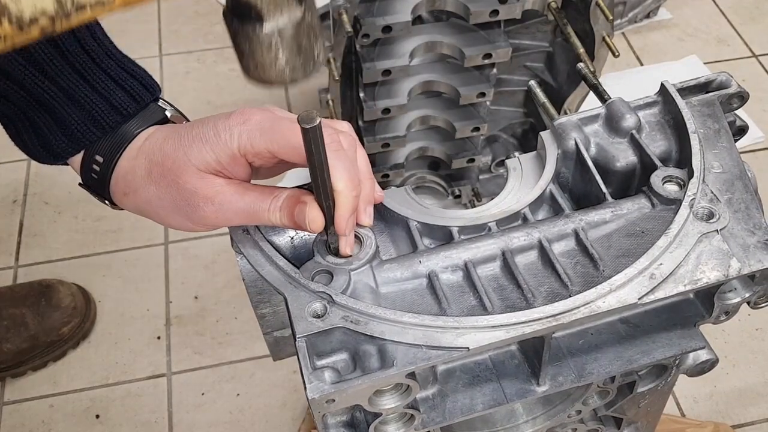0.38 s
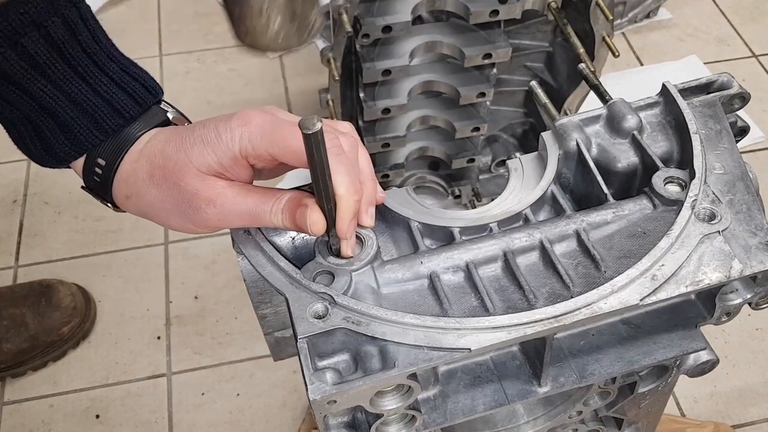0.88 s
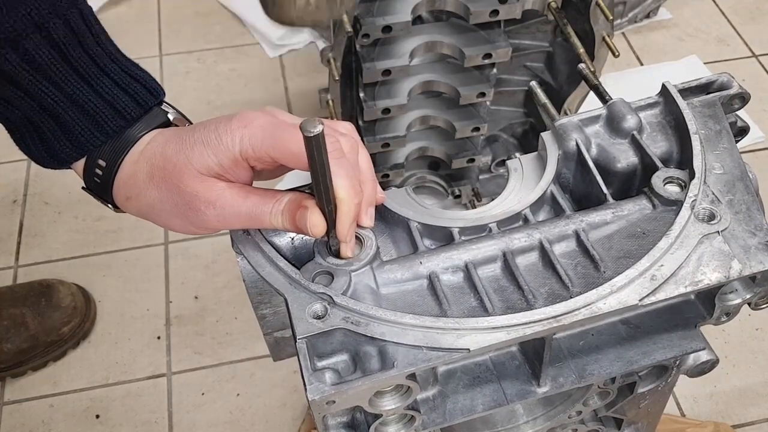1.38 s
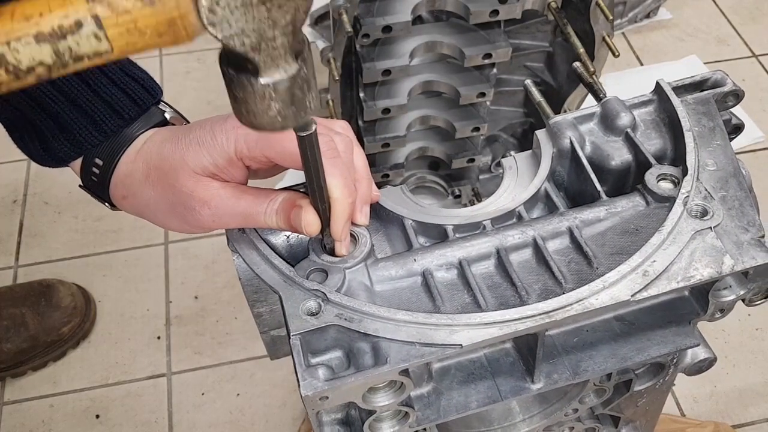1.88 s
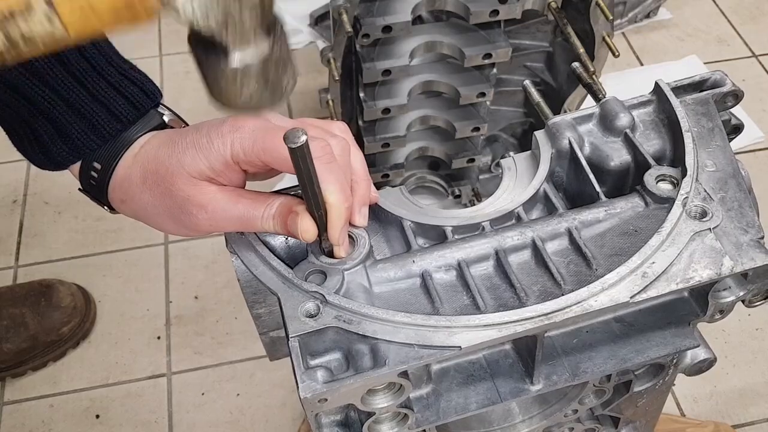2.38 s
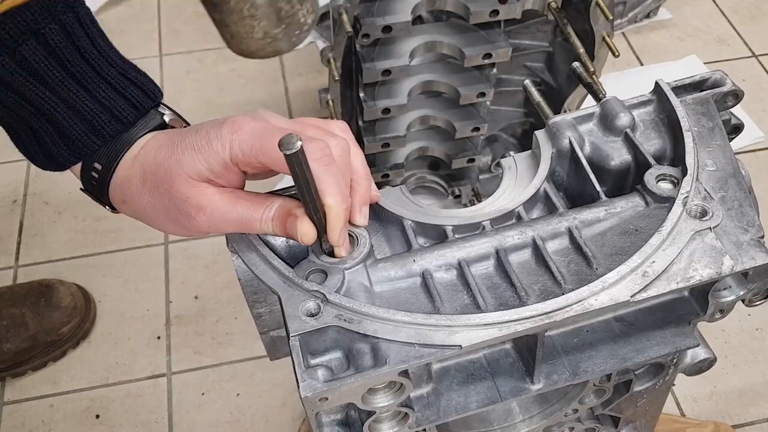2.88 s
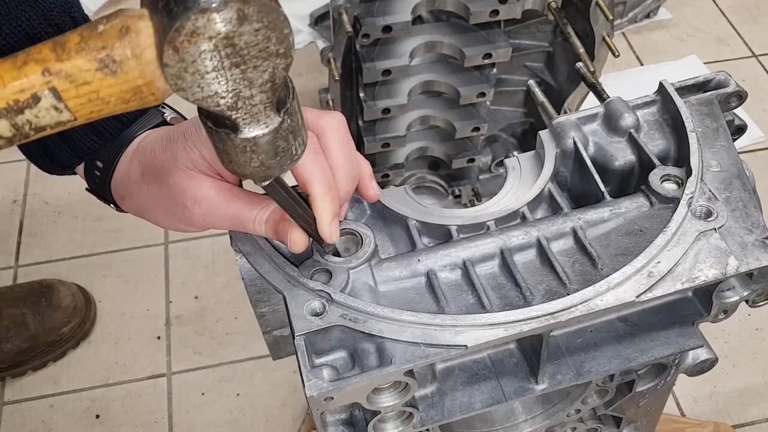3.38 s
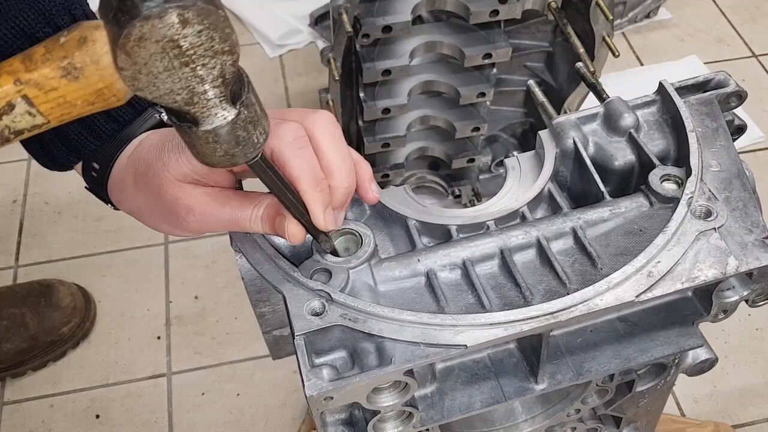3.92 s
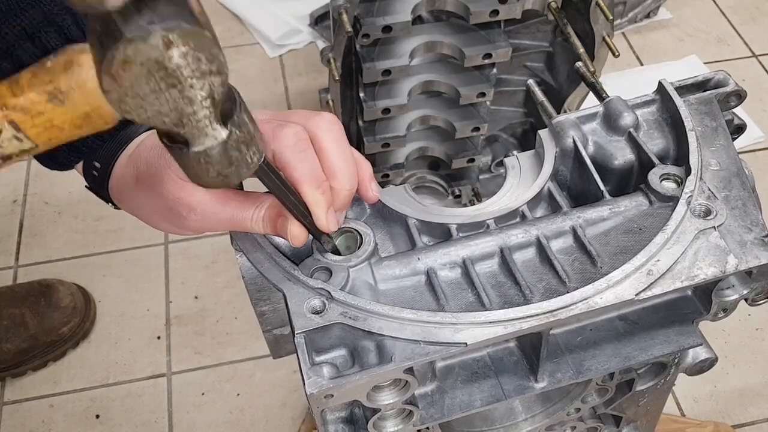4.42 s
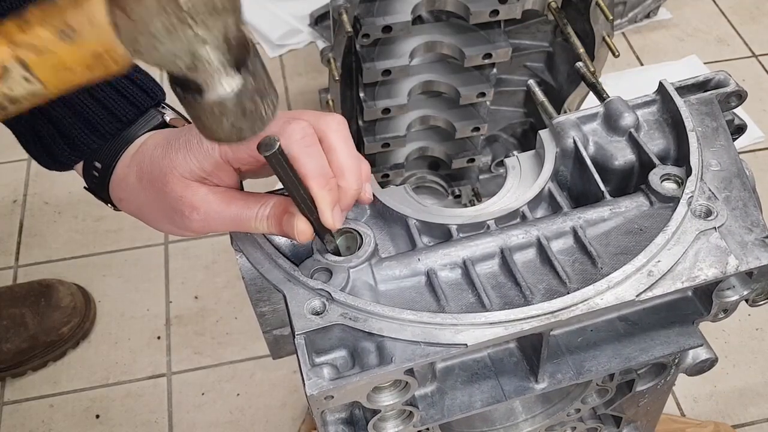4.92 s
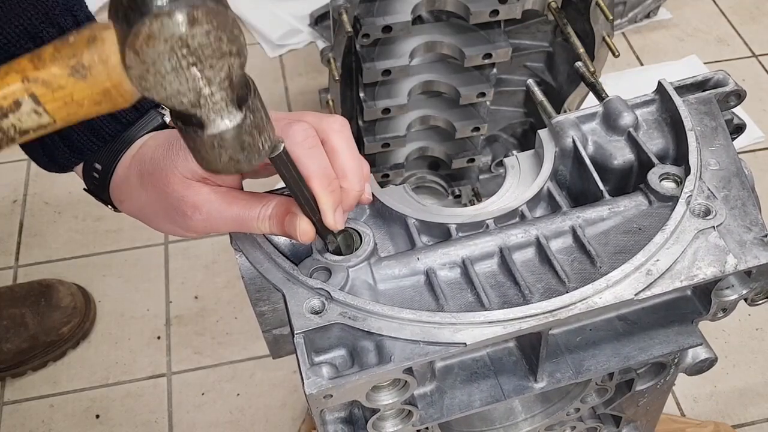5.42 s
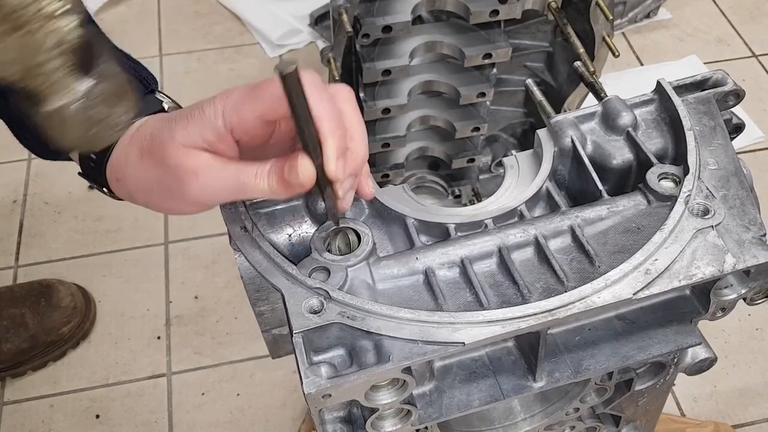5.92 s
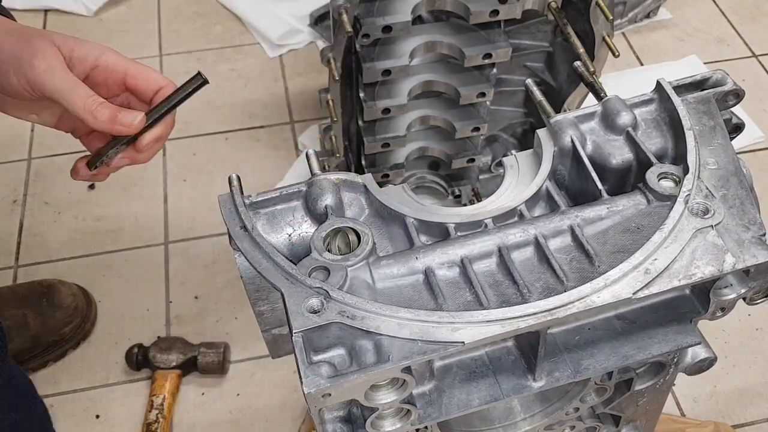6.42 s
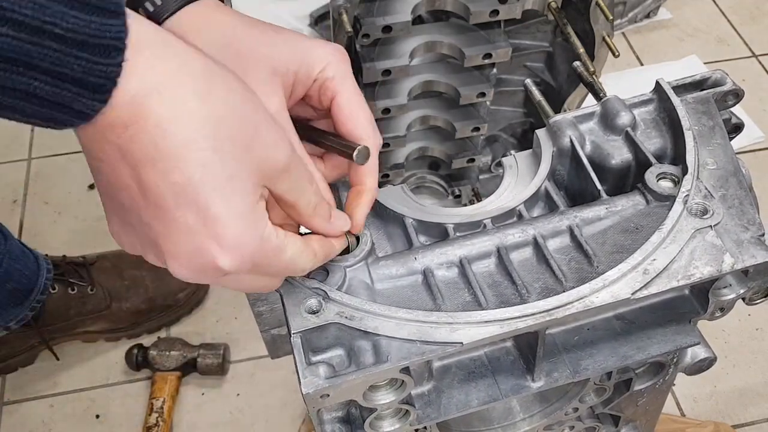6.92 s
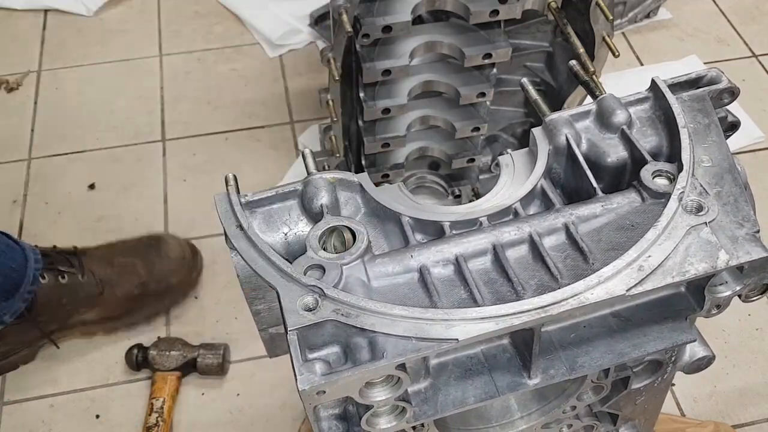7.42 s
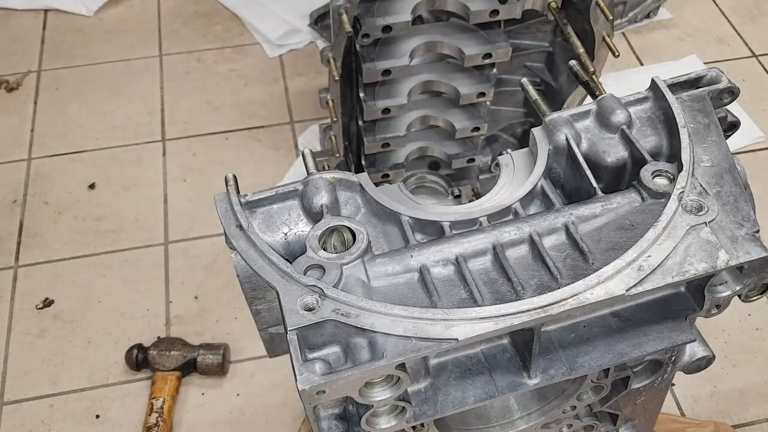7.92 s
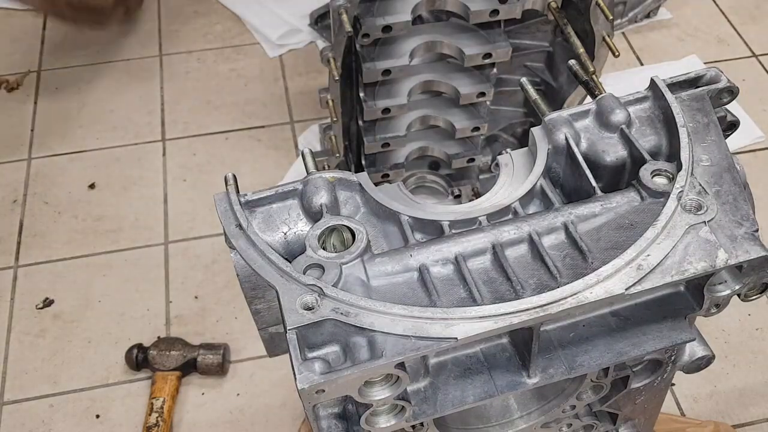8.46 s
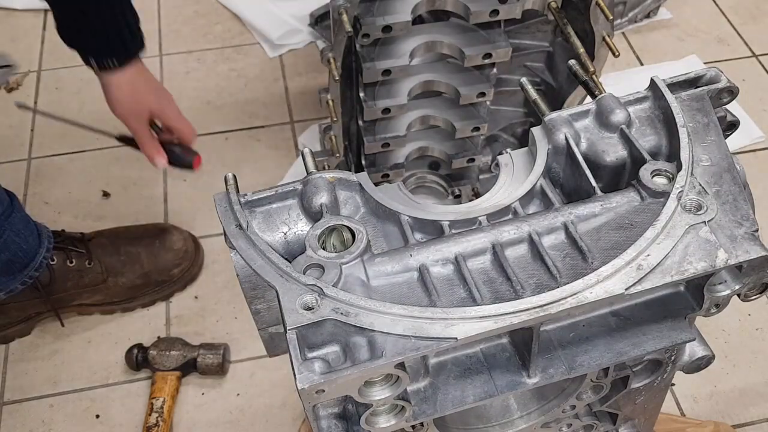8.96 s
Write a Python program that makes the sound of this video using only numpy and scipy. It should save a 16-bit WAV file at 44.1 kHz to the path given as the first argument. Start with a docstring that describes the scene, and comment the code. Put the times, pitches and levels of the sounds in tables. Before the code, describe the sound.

Close stereo pickup in a hard, tiled workshop, with very faint low air and a distant machine hum. From 0 to about 3.1 seconds a hammer strikes a steel punch on a cast engine block roughly ten times a second: sharp, dry cracks with short metallic ringing and a bright room wash, slightly weaker after 2 seconds. The level dips near 3.3, with a tiny click at 3.4 and light clatter around 3.95. A second burst runs from 4.07 to 4.55 at about twelve per second, its first blow strongest; a third from 4.99 to 5.77, ending in a glancing clink at 5.84. At 6.3-6.55 the hammer drops on tile with a loud crack and small bounces. Sleeves rustle, a nail picks faintly near 7.1, then boot knocks, clearest at 7.8, 8.3 and 8.6, continue softly to about 9.

```python
"""Hammer and punch on an engine block

A hammer taps a steel punch fast against a plug in a cast engine block, in three bursts, in a tiled workshop.
Each blow is a short push, a noise crack, ringing sines, a dense noise clang and a bright wash of the room.
The hammer is then dropped on the tiles, fingers pick at the plug and boots walk off, all as noise bursts;
the dropped head also rings in sines. Far away a machine hums in wavering sines, amid soft noise of air
and rustling cloth."""
import sys
import numpy as np
from scipy import signal
from scipy.fft import rfft, irfft
from scipy.io import wavfile
from scipy.ndimage import uniform_filter1d

SR = 44100
rng = np.random.default_rng(int(sys.argv[2]) if len(sys.argv) > 2 else 0)


def boost_factor(decibels):
    """Convert a level in decibels to a linear amplitude factor."""
    exponent = np.asarray(decibels, float) / 20
    return 10 ** exponent


def unload_audio(sound):
    """Save the sound as a 16-bit wav file, at the path given as the first command line argument."""
    columns = np.transpose(np.atleast_2d(sound))
    # keep every value between -1 and 1, then stretch to whole-number steps
    steps = np.round(np.clip(columns, -1, 1) * 32767)
    wavfile.write(sys.argv[1], SR, steps.astype(np.int16))


N = 399987

# Machine hum, one row a tone: pitch_hz, level_db
HUM_TONES = [(112, -83), (225, -78), (334, -78)]
# Tone of the air noise: pitch_hz, level_db
AIR_TONE = [(30, -45), (90, -14.5), (210, 5), (600, -2.5), (1000, -16.5), (16000, -32)]
# Likeness of left and right in air and cloth noise: pitch_hz, likeness (1 is the same)
AIR_LIKENESS = [(200, 1), (640, 0.053), (15000, 0.17)]
# Likeness of left and right in near sounds: pitch_hz, likeness (1 is the same, negative is opposed)
NEAR_LIKENESS = [(130, 0), (290, .2), (640, .84), (1410, .84), (3100, .3), (15000, -.2)]
# Sleeves and soles rustle: start_s, length_s, level_db
RUSTLES = [(3.659, 0.28, -84.5), (5.955, 0.34, -66.5), (6.539, .38, -62), (7.499, .7, -79.5),
           (8.656, 0.41, -77)]
# Tone of cloth, also used for the fingernail: pitch_hz, level_db
CLOTH_TONE = [(470, -34.5), (800, -2.5), (15900, 1), (16500, -11)]
# Boot soles on tile: start_s, level_db, dullness_db_per_octave (negative is brighter)
STEPS = [(3.817, -57.5, -2.5), (6.798, -47.5, 2), (7.591, -57, 3), (7.631, -60, -4), (7.73, -65, -10.5),
         (7.822, -34, 0.5), (7.982, -49, -5.5), (8.296, -41, 0), (8.571, -42.5, -1), (8.782, -55.5, 4.5),
         (8.919, -56, 1.5), (9.031, -46, -1.5)]
# Tone of a sole on tile: pitch_hz, level_db
SOLE_TONE = [(100, -22), (770, -0.5), (1680, -12), (4000, -31), (16000, -55)]
# Fingernail on the plug: start_s, level_db
PICKS = [(7.073, -65), (7.129, -64), ]
# Hammer head and handle land on tile: start_s, level_db, dullness_db_per_octave, head_ring_db
DROPS = [(6.32, -24, 5, -53), (6.379, -9, 3, -9), (6.516, -24, 3.5, -8.5), (6.533, -28, 5, -21)]
# Tone of the landing on tile: pitch_hz, level_db
TILE_TONE = [(100, -55), (818, -10), (1900, -3), (4770, -1), (14400, -16.5), (16000, -54.5)]
# Ringing of the hammer head: pitch_hz, level_db, time_to_fall_60_db_s
HEAD_RING = [(8600, -2, .008), (9500, -8, .005), (13950, -10, .006)]

# Hammer on punch: start_s, strength_db
BLOWS = [(0.1168, -17), (0.219, -17), (0.32, -18.5), (0.4158, -17.5), (0.516, -16), (0.6123, -15.5),
         (0.7071, -16.5), (0.802, -16.5), (0.897, -16), (0.99, -16), (1.0831, -16), (1.18, -16),
         (1.2749, -15.5), (1.3717, -16.5), (1.4653, -16.5), (1.56, -16.5), (1.6517, -16.5), (1.747, -17),
         (1.8386, -17.5), (1.9312, -18.5), (2.029, -19.5), (2.128, -20), (2.222, -20.5), (2.3157, -20.5),
         (2.4084, -19), (2.506, -21), (2.5956, -20), (2.689, -20), (2.782, -20.5), (2.876, -21),
         (2.9673, -21), (3.061, -24.5), (4.0688, -17.5), (4.1544, -19), (4.236, -23), (4.3126, -23),
         (4.39, -22.5), (4.469, -25), (4.548, -24.5), (4.9877, -23.5), (5.071, -21), (5.1508, -22.5),
         (5.2263, -22.5), (5.3048, -24), (5.385, -25.5), (5.4693, -28), (5.538, -24), (5.6123, -24.5),
         (5.692, -27), (5.767, -27)]
# The blow still ringing at the start, a single row: how_long_ago_s, strength_db
EARLIER_BLOW = (0.017, -29.5)
# Light or glancing contacts of the punch: start_s, strength_db, steel_over_casting_db, clank_near_3_khz_db
GLANCES = [(3.4081, -53, 26.5, -15.5), (3.9391, -34, 4.5, -3.5), (3.949, -38.5, 2, -7.5),
           (3.9577, -31.5, 12.5, -5.5), (5.842, -34, 14, 8)]
# The punch in the hand: time_s, looseness_db (steel clatter over casting), lean (0 upright to 1 slanted)
PUNCH_HOLD = [(0.11, 24, 0.08), (0.32, 12, 0.092), (0.8, 5.5, 0.021), (1.75, 5.5, 0.027),
              (2.05, -2.5, 0.25), (3.1, -5, 0.085), (3.35, -8.5, 0.91), (4.07, 0.5, 0.64),
              (4.55, -5.5, 0.69), (5.2, -1.5, 0.6), (5.4, 1.5, 0.83), (5.62, 4.5, 0.94), (5.85, 12, 0.91)]
# Ring near 2 kHz, duller as the plug gives way: time_s, level_db
PLUG_LEVEL = [(3.1, -1), (5.2, -3), (5.3, -11.5), (5.7, -5.5), (5.8, -4)]
# Pitches at which the balance of a blow is set: pitch_hz
KNOTS_HZ = (200, 450, 950, 1300, 2050, 3000, 4500, 6500, 9000, 10500)
# Ringing of casting and punch, one pitch for each row of the next table: pitch_hz
RING_HZ = (455, 635, 818, 930, 1020, 1177, 1210, 1285, 1382, 1582, 2245, 3510, 4542, 5280, 6860, 7290, 8097,
           8957, 9927, 10700, 13600)
# How loud and long each of them rings: level_db, time_to_fall_60_db_s
RING_LEVELS = [(-15.5, 0.11), (-13, 0.085), (-13, 0.17), (-16.5, 0.2), (-6, 0.13), (-4.5, 0.11),
               (0.5, 0.074), (-3, 0.064), (-4, 0.11), (-0.5, 0.1), (-9.5, 0.052), (-3, 0.054), (1.5, 0.1),
               (-4.5, 0.067), (7.5, 0.036), (-7, 0.073), (-11, .12), (2.5, 0.07), (-6.5, 0.12),
               (12, 0.0053), (5.5, 0.0051)]
# Tone of the first crack: pitch_hz, level_db
CRACK_TONE = [(30, -14.5), (520, -20), (1150, -0.5), (2100, -13), (3970, -19.5), (6900, -13.5),
              (10500, -16.5), (15700, -21.5), (16600, -46.5)]
# Tone of the dense ring and room after it: pitch_hz, level_db
CLANG_TONE = [(200, -21), (420, -17.5), (980, -5), (2100, -10.5), (4900, -19.5), (6720, -13),
              (10500, -22.5), (15700, -21.5), (16400, -55.5)]
# Bright wash of the tiled room: pitch_hz, level_db
SIZZLE_TONE = [(2500, -19), (6000, 2.5), (10000, -3.5), (15700, -2.5), (16400, -40.5)]

# The next five are single rows, added up: upright_db, db_per_looseness_db, extra_at_full_lean_db
# Casting near 450 Hz
THUD = (-10, 0.69, 26)
# Casting near 950 Hz
UNDER = (-3, 0.078, -0.34)
# 4.5 kHz ring of the punch
LOW_LINE = (-0.5, 0.65, -14)
# 9 kHz ring of the punch
HIGH_LINE = (-9.5, 0.36, 15.1)
# Left level minus right level
LEFT = (1.7, 0.04, 1.8)

# The level dips once, a single row: middle_s, half_width_s, change_db
DIP = (3.297, 0.099, -23)


def evened(x):
    """Scales to an average strength (rms) of 1."""
    return x / np.sqrt(np.mean(x ** 2) + 1e-20)


def read(points, hz):
    """Reads a table between its rows, with pitch on a log scale."""
    f, value = np.transpose(points)
    return np.interp(np.log(hz + 1), np.log(f + 1), value)


def at_time(table, s, column):
    """Reads one column of a table at s seconds."""
    columns = np.transpose(table)
    return np.interp(s, columns[0], columns[column])


def add(mix, s, sound):
    """Mixes a two-channel sound in at s seconds."""
    part = mix[:, round(s * SR):][:, :sound.shape[1]]
    part += sound[:, :part.shape[1]]


def pair(white, tone, likeness=NEAR_LIKENESS, extra_db=None):
    """Colours two white noises to rms 1, makes them partly alike, then adds extra_db, a function of Hz."""
    count = white.shape[1]
    hz = np.fft.rfftfreq(count, 1 / SR)
    a, b = rfft(white)
    c = np.clip(read(likeness, hz), -1, 1)
    coloured = np.array([a, c * a + np.sqrt(1 - c ** 2) * b]) * boost_factor(read(tone, hz))
    rms = np.sqrt(np.mean(abs(coloured) ** 2) / count)
    if extra_db:
        coloured = coloured * boost_factor(extra_db(hz))
    return irfft(coloured, count) / rms


def fade(t, t60, rise):
    """A quick rise and an exponential fall."""
    return (1 - np.exp(-t / rise)) * boost_factor(-60 * t / t60)


def machine_hum():
    """Steady sines whose level and pitch waver at random, the higher ones more in level."""
    shape = (len(HUM_TONES), N // 100 + 1)
    slow = evened(uniform_filter1d(rng.standard_normal(shape), size=30))
    waver = slow.repeat(100, 1)[:, :N]
    hz, db = np.transpose(HUM_TONES)[:, :, None]
    level = np.sqrt(2) * boost_factor(db + 1.2 * waver * hz / hz[0])
    wavering_hz = hz * (1 + 0.004 * waver[::-1])
    return (level * np.sin(2 * np.pi * np.cumsum(wavering_hz, 1) / SR)).sum(0)


def air():
    """Steady noise of the room's air, mostly low."""
    return boost_factor(-75.5) * pair(rng.standard_normal((2, N)), AIR_TONE, AIR_LIKENESS)


def cloth():
    """Noise of rubbing cloth: each rustle swells slowly and stops sooner; a faint hiss stays."""
    t = np.arange(N) / SR
    peak_share, edge_db, hiss_db = 0.7, -28.5, -85.5  # loudest at this share of its length
    start, length, db = np.transpose(RUSTLES)[:, :, None]
    u = (t - start) / length - peak_share
    u = np.where(u < 0, u / peak_share, u / (1 - peak_share))
    level = boost_factor(hiss_db) + boost_factor(db + edge_db * u ** 2).sum(0)
    return level * pair(rng.standard_normal((2, N)), CLOTH_TONE, AIR_LIKENESS)


def knock(tone, t, db, dull_db, t60):
    """Two things meet: a short noise burst and its slower room tail."""
    def tilt(hz):
        return -dull_db * np.log2(np.maximum(hz, 200) / 1500)
    burst = pair(rng.standard_normal((2, len(t))), tone, extra_db=tilt)
    tail = pair(rng.standard_normal((2, len(t))), tone, extra_db=tilt)
    return boost_factor(db) * (burst * fade(t, 0.017, 0.00045) + boost_factor(-3) * tail * fade(t, t60, 0.0047))


def boots(t):
    """Soles knock on the tiles, each step with its own dullness."""
    sound = np.zeros((2, N))
    for s, db, dull_db in STEPS:
        add(sound, s, knock(SOLE_TONE, t, db, dull_db, 0.14))
    return sound


def fingernail(t):
    """A nail picks at the plug: faint bright knocks."""
    sound = np.zeros((2, N))
    for s, db in PICKS:
        add(sound, s, knock(CLOTH_TONE, t, db, 0, 0.13))
    return sound


def walls(t):
    """Dense echoes of tiles and benches, which roughen each ring, and one dull early echo off the floor."""
    tone = [(2000, -3.5), (9000, -4.5)]  # pitch_hz, level_db
    echoes = pair(rng.standard_normal((2, len(t))), tone) * fade(t, 0.28, 0.002)
    bounce = np.exp(-((t - 0.0095) / 0.00012) ** 2)
    return boost_factor(-9) * echoes / np.linalg.norm(echoes[0]) - boost_factor(-11.5) * bounce / bounce.sum()


def modes(table, t, level_db, spread_db, echoes):
    """Dying sines and their echoes; strength changes blow to blow, phase differs between left and right."""
    hz, db, t60 = np.transpose(table)[:, :, None]
    phase, apart, size = rng.standard_normal((3, len(table), 1))
    # low modes of heavy metal take longer to build than high ones
    build_s, build_hz, build_slope = 0.0041, 1400, 1.67
    bloom = 1 - np.exp(-(t / build_s * (hz / build_hz) ** build_slope) ** 2)
    gain = boost_factor(db + level_db(hz) + spread_db * size - 60 * t / t60) * bloom
    likeness = np.clip(read(NEAR_LIKENESS, hz), -1, 1)
    off = (1 + 0.2 * apart) * np.arccos(likeness) / 2
    angle = 2 * np.pi * hz * t + 0.3 * phase
    ring = np.array([(gain * np.sin(angle + side * off)).sum(0) for side in (-1, 1)])
    return ring + signal.fftconvolve(ring, echoes, axes=1)[:, :len(t)]


def dropped_hammer(t):
    """Head and handle knock on the tiles, and the small steel head rings high and briefly."""
    sound = np.zeros((2, N))
    for s, db, dull_db, ring_db in DROPS:
        head = modes(HEAD_RING, t, lambda hz: ring_db, 2.4, 2 * walls(t))
        add(sound, s, knock(TILE_TONE, t, db, dull_db, 0.2) + head)
    return sound


def ribs(count, depth_db):
    """Countless small modes of the ribbed casting: the same narrow random peaks in every blow."""
    field = evened(uniform_filter1d(rng.standard_normal(count // 2 + 1), size=14))
    return depth_db * np.maximum(field, -1)


def balance(s, mean_db, loose_db, snap_db, lean):
    """Levels at the knots, for the noise and for the ringing: a loose punch gives more steel, less casting."""
    body_db, under_db, low_db, high_db = (
        a + b * loose_db + c * lean for a, b, c in (THUD, UNDER, LOW_LINE, HIGH_LINE))
    steel_db, cast_db = mean_db + loose_db / 2, mean_db - loose_db / 2
    plug_db = at_time(PLUG_LEVEL, s, 1)
    half_plug_db = mean_db + plug_db / 2
    noise_db = [cast_db + 4 * rng.standard_normal(), cast_db + body_db, cast_db + under_db, cast_db,
                mean_db - loose_db / 4 + plug_db, half_plug_db + 0.51 * snap_db, half_plug_db, steel_db,
                mean_db + high_db / 2, mean_db + high_db / 2]
    # the grip damps the ringing lines of the punch most
    ring_db = noise_db[:6] + [mean_db + low_db, steel_db - 14 * lean, mean_db + high_db, mean_db]
    return list(zip(KNOTS_HZ, noise_db)), list(zip(KNOTS_HZ, ring_db))


def blow(s, mean_db, loose_db, snap_db, habit, peaks_db, echoes, t):
    """Contact pulse, crack, ringing modes, dense clang and room wash; the casting answers much alike each time."""
    lean = at_time(PUNCH_HOLD, s, 2)
    noise_knots, ring_knots = balance(s, mean_db, loose_db, snap_db, lean)

    # the first push is lower when slanted, and then harder per dB of looseness
    pulse_db = mean_db + snap_db + 2.5 + 0.77 * loose_db * lean
    pulse_hz = 3330 + (2500 - 3330) * lean
    since_peak = t - 0.0003
    swing = np.cos(2 * np.pi * pulse_hz * since_peak)
    contact = -boost_factor(pulse_db) * swing * np.exp(-(since_peak / 0.00041) ** 2)

    # mostly the same noise in every blow, partly new
    white = 0.97 * habit + 0.5 * rng.standard_normal(habit.shape)
    crack = pair(white[0], CRACK_TONE, extra_db=lambda hz: read(noise_knots, hz))
    crack *= fade(t, 0.0322, 0.0001) + 0.6 * boost_factor(-60 * t / 0.0059)
    crack *= boost_factor(4.5 + min(snap_db, 0))
    clang = pair(white[1], CLANG_TONE, extra_db=lambda hz: read(noise_knots, hz) + peaks_db)
    clang *= boost_factor(-8) * fade(t, 0.19, 0.0048)

    table = np.c_[RING_HZ, RING_LEVELS]
    ring = boost_factor(-4.5) * modes(table, t, lambda hz: read(ring_knots, hz), 1.8, echoes)
    sizzle = pair(rng.standard_normal((2, len(t))), SIZZLE_TONE, extra_db=lambda hz: peaks_db)
    sizzle *= boost_factor(mean_db + 0.44 * loose_db - 28) * fade(t, 0.35, 0.0043)

    upright_db, per_loose, leaning_db = LEFT
    pan_db = upright_db + per_loose * loose_db + leaning_db * lean
    return (contact + crack + clang + ring + sizzle) * boost_factor([[pan_db / 2], [-pan_db / 2]])


def hammering(t):
    """Every blow and glancing contact excites the same casting in the same room."""
    habit = rng.standard_normal((2, 2, len(t)))
    shared = (habit, ribs(len(t), 4.5), walls(t), t)
    sound = np.zeros((2, N))
    ago_s, earlier_db = EARLIER_BLOW
    earlier = blow(0, earlier_db, PUNCH_HOLD[0][1], 0, *shared)
    add(sound, 0, earlier[:, round(ago_s * SR):])
    for s, db in BLOWS:
        add(sound, s, blow(s, db, at_time(PUNCH_HOLD, s, 1), 0, *shared))
    for s, db, loose_db, clank_db in GLANCES:
        add(sound, s, blow(s, db, loose_db, clank_db, *shared))
    return sound


def scene():
    """All sources together; boots, nail and dropped hammer sit slightly to the left."""
    t = np.arange(16384) / SR  # time within one knock or blow
    background = machine_hum() + air() + cloth()
    small_sounds = boots(t) + fingernail(t) + dropped_hammer(t)
    return background + small_sounds * boost_factor([[0.8], [-0.8]]) + hammering(t)


def roll_off(x):
    """The treble ends steeply here."""
    return signal.sosfilt(signal.butter(12, 17130, fs=SR, output="sos"), x)


def record(dry):
    """Gain control lifts quiet stretches and lets go under the blows; then one dip, soft overload and own hiss."""
    t = np.arange(N) / SR
    power = signal.lfilter([0.002], [1, -0.998], (dry ** 2).mean(0))
    fall_db = 45 * t  # the held level falls by 45 dB a second
    held_db = np.maximum.accumulate(10 * np.log10(power + 1e-12) + fall_db) - fall_db
    gain_db = np.clip(-0.5 * (held_db + 34), 0, 9)
    middle_s, half_width_s, dip_db = DIP
    gain_db += dip_db * np.exp(-abs((t - middle_s) / half_width_s) ** 3)
    overloaded = np.tanh(dry * boost_factor(gain_db))
    hiss = boost_factor(-80.5) * rng.standard_normal(dry.shape)
    return roll_off(overloaded + hiss)


dry = scene()
out = record(dry)
unload_audio(out)
```